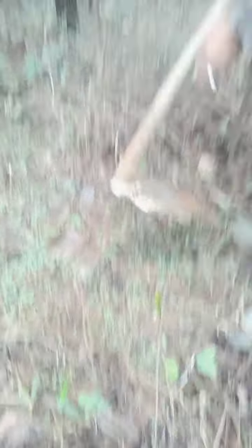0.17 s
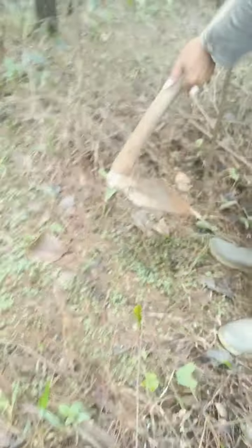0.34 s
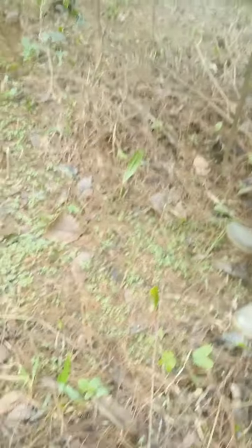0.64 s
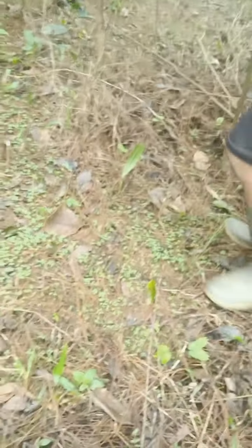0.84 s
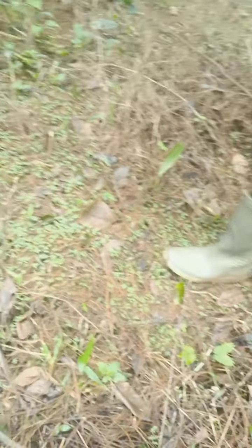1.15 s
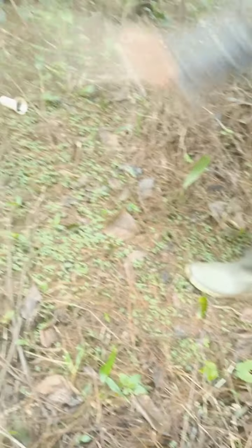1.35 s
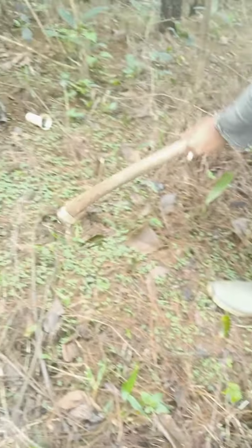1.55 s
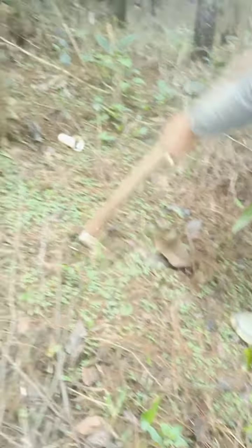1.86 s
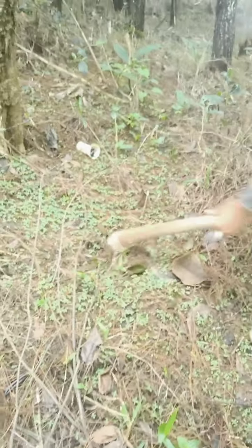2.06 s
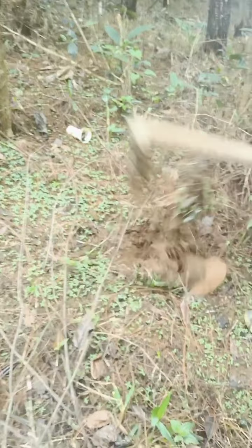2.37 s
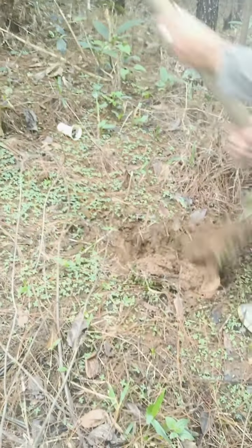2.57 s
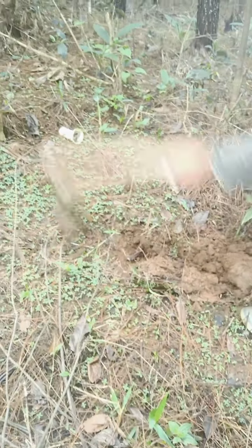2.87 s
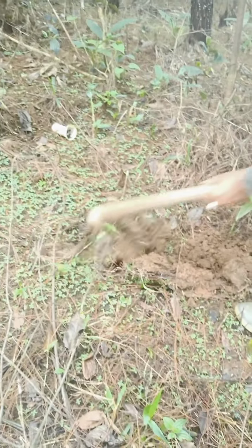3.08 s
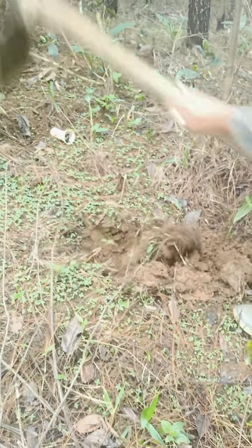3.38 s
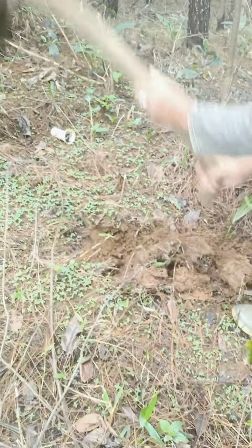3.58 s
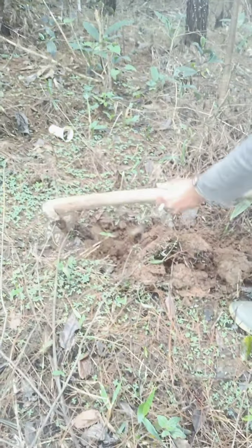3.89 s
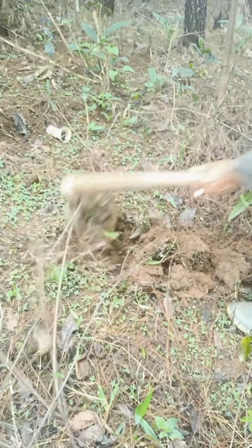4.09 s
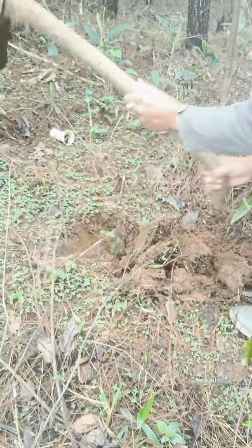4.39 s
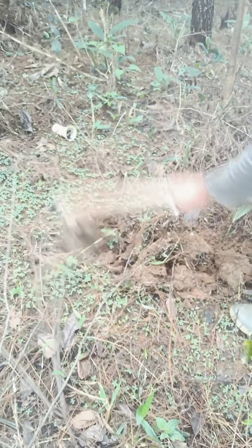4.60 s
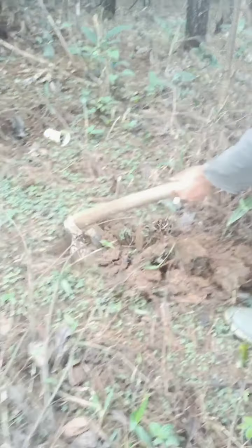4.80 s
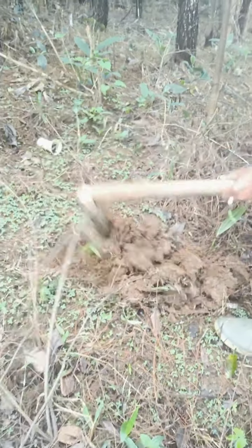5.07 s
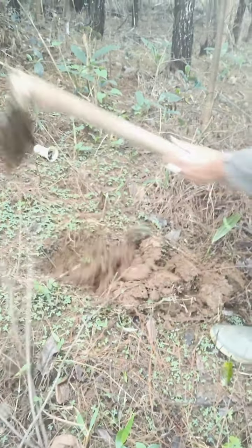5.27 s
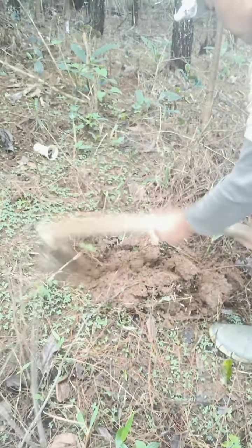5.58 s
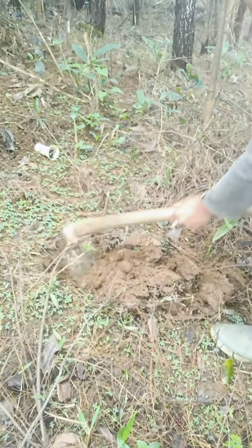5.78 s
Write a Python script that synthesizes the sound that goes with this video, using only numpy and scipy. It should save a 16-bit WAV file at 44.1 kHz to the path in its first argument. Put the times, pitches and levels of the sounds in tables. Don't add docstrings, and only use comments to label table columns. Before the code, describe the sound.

Steady hoe strokes bite into dry, littered ground, each with a crunchy clank and thud, then trickling dirt over a faint distant engine.

```python
import sys
import numpy as np
from scipy import signal
from scipy.fft import rfft, irfft, next_fast_len
from scipy.io import wavfile
from scipy.ndimage import uniform_filter1d, map_coordinates

SR = 44100
rng = np.random.default_rng(int(sys.argv[2]) if len(sys.argv) > 2 else 0)


def pcm_store(signal):
    levels = np.round(np.clip(np.atleast_2d(signal), -1, 1) * 32767)
    wavfile.write(sys.argv[1], SR, levels.astype(np.int16).T)


def rack_gain(trim_db):
    fader = np.asarray(trim_db, float)
    return 10 ** (fader / 20)


N = 261954


def along(points, hz):
    f, v = np.transpose(points)
    return np.interp(np.log(hz + 1), np.log(f + 1), v)


def curves(rows):
    s, *cols = np.transpose(rows)
    return [np.interp(np.arange(N) / SR, s, c) for c in cols]


def unit(x):
    return x / np.sqrt(np.mean(x ** 2) + 1e-20)


def wobble(rate):
    knots = rng.standard_normal(int(N * rate / SR) + 4)
    return map_coordinates(knots, [np.arange(N) * rate / SR])


def filtered(x, response):
    m = next_fast_len(N + 8192)
    return irfft(rfft(x, m) * response(np.fft.rfftfreq(m, 1 / SR)), m)[..., :N]


def ringing(x, modes):
    def response(f):
        total = 0
        for k, (hz, width, db) in enumerate(modes):
            total = total + (-1) ** k * rack_gain(db) * 1j * f * width / (hz * hz - f * f + 1j * f * width)
        return unit(np.abs(total)) * np.exp(1j * np.angle(total))
    return filtered(x, response)


def spread(pair):
    # hz, correlation
    likeness = [(100, 0.882), (400, 0.792), (1000, 0.064), (3000, 0.168), (8000, -0.226), (14000, 0.081)]

    def mid_side(hz):
        turn = np.arccos(np.clip(along(likeness, hz), -1, 1)) / 2
        return np.array([np.cos(turn), np.sin(turn)])
    mid, side = filtered(pair, mid_side)
    return np.array([mid + side, mid - side])


def gritty(shape, share, spiky_db):
    size_db = spiky_db * np.minimum(rng.exponential(size=shape[-1]), 2.2)
    is_grain = rng.random(shape[-1]) < share
    return rng.standard_normal(shape) * (1 + is_grain * rack_gain(size_db))


def patchy(x, patchy_db):
    z = signal.stft(x, nperseg=512)[2]
    field = uniform_filter1d(rng.standard_normal(z.shape[1:]), size=5, axis=0)
    field = uniform_filter1d(field, size=5, axis=1)
    return signal.istft(z * rack_gain(patchy_db * unit(field)), nperseg=512)[1][:, :N]


def air():
    # time_s, level_db
    murmur_level = [(0, -59), (.3, -60.5), (1.9, -59.5), (3.4, -61), (5.94, -60)]
    # hz, level_db per Hz
    murmur_colour = [(24, -33.5), (40, -8), (48, -6), (91, 2.5), (268, -2.5), (333, 3), (408, -4.5),
                     (600, -7.5), (780, -43.5), (1320, -120)]
    # time_s, firing_hz, level_db
    engine_drift = [(0, 34.13, -59), (.15, 34.71, -55.5), (.61, 35.97, -57.5), (.89, 34.91, -59),
                    (1.37, 35.21, -60.5), (1.72, 34.81, -60), (1.85, 33.16, -61), (2.15, 35.42, -60),
                    (2.6, 36.8, -61.5), (2.99, 38.4, -64.5), (3.32, 38.37, -63.5), (3.55, 37.57, -67.5),
                    (4.18, 38.92, -64.5), (4.4, 38.4, -65.5), (4.8, 38.49, -66.5), (5.34, 36.32, -62.5),
                    (5.68, 35.26, -64.5), (5.94, 32.2, -63.5)]
    # multiple, level_db
    orders = [(2.5, -3.5), (3, -5), (4, -0.5), (5, -7), (6, -4), (7, -3.5), (8, -2.5), (9, -0.5),
              (10, -6.5)]
    murmur_db, = curves(murmur_level)
    firing_hz, engine_db = curves(engine_drift)
    noise = spread(filtered(rng.standard_normal((2, N)), lambda hz: rack_gain(along(murmur_colour, hz))))
    phase = 2 * np.pi * np.cumsum(firing_hz) / SR
    engine = 0
    for k, db in orders:
        engine = engine + rack_gain(db + 1.31 * wobble(3.069)) * np.sin(k * phase + k * k / 16)
    return rack_gain(murmur_db + 1.33 * wobble(8.2)) * unit(noise) + rack_gain(engine_db) * unit(engine)


def showers():
    # peak_s, rise_s and fall_s per 10 dB, level_db, grit_db over the rustle
    falls = [(.14, 0.62, 0.66, -63, 1), (.54, .5, .45, -59, -1), (.9, .3, .2, -66, 2),
             (1.345, 0.0541, .1, -50, -8), (1.5, 0.19, 0.2172, -56.5, -5), (1.4, .05, .1, -61, -14),
             (1.6, .25, .09, -53, -2), (1.75, .2, .5, -65, -1), (2.035, 0.0444, 0.26, -54.5, -1.5),
             (2.331, 0.0966, .15, -49, -5), (2.36, .03, .04, -54, -8), (2.47, .08, .06, -50, -12),
             (2.52, .07, 0.07, -46, -12), (2.57, 0.0728, 0.1442, -49, -1.5), (2.8, 0.1153, 0.19, -53.5, -3),
             (3.09, 0.4, 0.3134, -59.5, -1.5), (3.42, -0.05, -0.01, -64.5, -2.5),
             (3.675, 0.02, 0.1432, -59.5, 2.5), (3.92, .3, 0.34, -61, -17), (4.12, 0.36, 0.25, -56, 0),
             (4.65, 0.22, 0.24, -62, -4.5), (4.83, .15, .35, -58, 1), (5.05, .15, 0.3058, -56, -2),
             (5.25, 0.19, 0.47, -62, 1), (5.535, 0, 0.1443, -59.5, 1), (5.93, .09, 0.4, -47.5, -5)]
    # leaves_db, grit_db, clods_db
    rest_db = (-69, -73.5, -69.5)
    t = np.arange(N) / SR
    power = rack_gain(2 * np.array(rest_db))[:, None] * np.ones(N)
    for s, rise, fall, db, fine_db in falls:
        swell_db = db - 10 * np.maximum((s - t) / rise, (t - s) / fall)
        lumps_db = -8.5 - 0.557 * fine_db
        power += rack_gain(2 * swell_db) * rack_gain(2 * np.array([[0], [fine_db], [lumps_db]]))
    swish_db = np.where(t < 1.31, -57.5 - 10 * np.maximum(1.1 - t, 0) / 0.2, -120)
    return [*10 * np.log10(power), swish_db]


def litter():
    # hz, level_db per Hz
    leaf = [(760, -37), (1300, -14), (1660, -3), (1830, -6), (2100, 1), (2580, 0), (3800, -10.5),
            (4940, -39), (8360, -120)]
    # hz, level_db per Hz
    grit = [(2120, -41.5), (3600, -10.5), (4300, -6), (5140, -3.5), (6250, -7), (7520, -12.5), (9670, -13),
            (13500, -15), (15600, -19.5)]
    # hz, level_db per Hz
    crumbs = [(250, -34), (420, -5), (524, -10.5), (777, 0.5), (1220, -4.5), (1400, -5.5), (1820, -32.5),
              (3080, -120)]
    # hz, level_db per Hz
    brush = [(1500, -60), (1950, -13), (2120, 0), (2500, -5), (3050, 0), (3500, -7), (4100, -22),
             (5500, -26), (5900, -9), (6300, -40)]
    clump_db = 0.7 * wobble(16) + 1.5 * wobble(60) + 0.7 * wobble(130)
    out = 0
    for db, colour, grainy in zip(showers(), (leaf, grit, crumbs, brush), (1, 1, 1.3, 0.3)):
        spikes = np.abs(gritty((N,), share=0.011, spiky_db=9.5)) + 0.62
        clumped = spikes * rack_gain(clump_db + 1.05 * wobble(30))
        grains = patchy(rng.standard_normal((2, N)), patchy_db=1.5) * clumped ** grainy
        coloured = filtered(grains, lambda hz: rack_gain(along(colour, hz)))
        out = out + rack_gain(db + 1.46) * unit(spread(coloured))
    return out


def breaks():
    # start_s, peak_db, crack_db, knock_db
    pebbles = [(.0518, -47, -18, -4.5), (.2894, -49, -7, -12), (.4511, -59.5, 7, -20.5),
               (.5242, -54.5, -11, 1.5), (0.9299, -56, 1.5, -8), (1.0154, -52, -12, -4.5),
               (1.596, -50, 0, -20), (1.645, -50, -6, -4), (1.9117, -45, -33, -13.5),
               (3.058, -48.5, -19, -11), (3.454, -45.5, -10, -12.5), (3.8383, -46.5, -11.5, 0.5),
               (4.3114, -46.5, -16, -17), (4.6675, -43.5, -23, -6), (4.7053, -45, -34, -2),
               (4.8773, -45, -20, -11), (5.1701, -50.5, -12.5, -5), (5.389, -49.5, -3, -18.5),
               (5.4088, -47.5, -8, -27), (5.5652, -51, -19, 3.5), (5.659, -42, -8.5, -27.5),
               (5.816, -53, 0, -7.5)]
    # start_s, peak_db,
    # pitch_hz, crack_db, pan_db
    twigs = [(0.1162, -40, 2144, -7.5, 4), (0.6665, -46.5, 2460, -3, 2), (.7612, -42.5, 2340, -16, 2),
             (1.9772, -34.5, 2820, -21, -2.5), (1.9811, -42, 2200, -9.5, 2), (2.072, -41.5, 2540, -9.5, -3),
             (2.2937, -44, 2038, -20, -11), (2.3248, -35, 2123, -7, 2.5), (2.615, -30, 2310, -11, -4.5),
             (3.243, -30.5, 2422, -5.5, 4.5), (3.4122, -22, 2500, -14, 2.5), (3.4159, -32, 2580, -18, -2),
             (3.9011, -38, 2530, -18, -2), (3.931, -35.5, 2100, -7.5, 1.5), (4.1926, -41, 2435, -3.5, 3),
             (4.5521, -19, 1950, -30, 0), (4.6501, -15, 2235, -30, 0), (4.9855, -40, 2580, -15, -1.5),
             (5.019, -39, 2610, -8.5, 2), (5.0444, -44.5, 2400, -8, -19.5), (5.247, -44, 2600, -8.5, -0.5),
             (5.8623, -39.5, 2690, -30, 9), (5.9097, -32, 3116, -1, 1)]
    found = [(s, db, hz, crack_db, -17, pan_db) for s, db, hz, crack_db, pan_db in twigs]
    luck = rng.standard_normal((len(pebbles), 2))
    for (s, db, crack_db, knock_db), (a, b) in zip(pebbles, luck):
        found.append((s, db, 2310 * (1 + 0.069 * a), crack_db, knock_db, 5 * b))
    return found


def ticks():
    # hz, width_hz, level_db
    crack_modes = [(4370, 350, -3), (5050, 350, 0), (5950, 400, 0), (7200, 900, -1), (10500, 4000, -8),
                   (13400, 1200, -2)]
    out, cracks = np.zeros((2, N + SR)), np.zeros((2, N + SR))
    t = np.arange(SR // 40) / SR
    for s, db, hz, crack_db, knock_db, pan_db in breaks():
        at = slice(round(s * SR), round(s * SR) + len(t))
        late = np.maximum(t - rng.uniform(0, 0.0002116, (2, 1)), 0)
        level = rack_gain(db + 2.5 + np.array([[pan_db / 2], [-pan_db / 2]]))
        swell = (late / 0.00046 * np.exp(1 - late / 0.00046)) ** 2
        twig = swell * (np.sin(2 * np.pi * hz * late) + 0.33 * np.sin(2 * np.pi * 2.074 * hz * late))
        wander = np.cumsum(rng.normal(0, 0.31, len(t)))
        rattle = rack_gain(-20 - 60 * t / 0.0272) * np.sin(2 * np.pi * hz * t + wander)
        knock = (1 - np.exp(-t / 0.000643)) * rack_gain(knock_db + 7 - 60 * t / 0.01233)
        knock *= np.sin(2 * np.pi * rng.uniform(820, 1000) * t)
        out[:, at] += level * (twig + rattle + knock)
        crack = (1 - np.exp(-t / 0.000653)) * rack_gain(crack_db + 10.5 - 60 * t / 0.00738)
        cracks[:, at] += level * crack * rng.standard_normal((2, len(t)))
    return out[:, :N] + ringing(cracks[:, :N], crack_modes)


def clods():
    # start_s, pitch_hz, level_db
    drops = [(.525, 578, -47.5), (1.025, 388.4, -41), (2.312, 790, -42), (2.43, 780, -45),
             (2.465, 800, -45), (2.482, 760, -41), (2.505, 800, -44), (2.516, 820, -41), (2.527, 780, -41),
             (2.545, 800, -45), (4.585, 260, -42), (5.565, 545.8, -43.5), (5.849, 420, -36)]
    out, t = np.zeros(N + SR), np.arange(SR // 10) / SR
    for s, hz, db in drops:
        t60 = 0.0477 * min(1, 450 / hz)
        envelope = (1 - np.exp(-t / 0.00166)) * rack_gain(db - 60 * t / t60)
        out[round(s * SR):][:len(t)] += envelope * np.sin(2 * np.pi * hz * t)
    return out[:N]


def crush_steps():
    # start_s, blade_db, edge_db over the blade, depth (0-1)
    cuts = [(1.302, -50.5, -1.5, 0.38), (1.3131, -29.5, -3.5, 0.49), (1.3185, -16, -9, .6),
            (1.3211, -11.5, -4.5, 0.42), (1.3232, -16.5, -24, 0.21), (2.7863, -37, -1, 0.04),
            (2.806, -34.5, -1.5, 0.49), (2.8115, -25.5, -6, 0.78), (2.8135, -19, -2, 0.68),
            (2.8155, -18, -6.5, 0.45), (2.8384, -32.5, -2, 0.08), (3.612, -36.5, -5, 0.08),
            (3.6262, -23.5, -7, 0), (3.6314, -30, 4.5, 0.05), (3.6349, -23, -0.5, 0.83),
            (4.5305, -34.5, -7.5, 0), (4.5423, -35.5, 4, 0), (4.5514, -19.5, -13.5, 0.03),
            (4.5557, -31, 0, 0.98), (4.5781, -47, 7, 0.06), (4.5983, -48, -9.5, 0.02), (5.459, -50, -7, .2),
            (5.4646, -40.5, -6, 0.72), (5.472, -37, -1, 0.69), (5.4769, -33.5, .5, 0.51),
            (5.49, -40, -4.5, 0.83), (5.4973, -35.5, -1, 0.69), (5.5024, -32.5, -6, 0.83)]
    # first_s, level_db, gap_s, loss_db a step
    settles = [
        (1.326, -23, 0.00497, 10),
        (2.8204, -28, 0.00813, 5.5),
        (3.6404, -28.5, .0049, 2),
        (4.5589, -32.5, .009, 5.5),
        (5.5129, -39.5, .018, 17.5),
    ]
    # start_s, blade_db, edge_db over the blade, depth (0-1)
    drags = [(2.004, -52, 2, .2), (2.01, -48, 0, .4), (2.312, -41, -5.5, 0.47), (2.3217, -39, -1.5, 0.3),
             (2.5137, -43, -15, 0.62), (2.5313, -39, -8, .3), (2.548, -42.5, -5.5, .25),
             (3.386, -53.5, -13.5, 0.78), (5.019, -44, -0.5, 0.44), (5.043, -42.5, .5, .3),
             (5.124, -48.5, 1.5, 0.32), (5.8481, -42.5, -22.5, 0.88), (5.926, -43.5, 0.5, 0)]
    # from_s, clods_db, thud_db, dust_db
    soils = [(0, -3, -8, -9), (2, 1, -4, -2), (2.7, -4, -4, -2), (3.5, 1, 0, -4.5), (3.62, -3, -6, 7),
             (4.4, 0, -8, -7.5), (4.54, 0, -12, 1), (4.9, -1, 2.5, -0.5), (5.4, -4, -5, 1),
             (5.7, -1.5, 0, 4.5)]
    settling = []
    for s, db, gap, loss_db in settles:
        for k in range(3):
            settling.append((s + k * gap, db - k * loss_db, -6, 0.684 + 0.04 * k))
    steps = []
    for s, db, edge_db, depth in cuts + settling + drags:
        clod_db, thud_db, dust_db = [soil for start, *soil in soils if start <= s][-1]
        clod_db += -14 + 15 * depth
        thud_db += -24 + 27 * depth
        t60 = 0.024 - 0.00044 * (db + 12)
        steps.append((s, db, edge_db, clod_db, thud_db, dust_db, t60))
    return steps


def rings():
    # start_s, blade_db, ground_db, pan_db, left_lag_s
    moments = [
        (1.3195, -7, -14, -1.5, .00004),
        (2.8125, -9.5, -15, -.5, -.00004),
        (3.634, -15, -16, 2, .00003),
        (4.5535, -15, -23, 0, 0),
        (5.474, -27, -26, 0, 0),
        (5.501, -24, -23, 0, 0),
    ]
    # pitch_hz, width_hz, level_db
    grips = [
        [(689, 45, -4), (904, 40, -4), (1600, 51, -6), (1810, 59, -4), (2140, 36, -6), (2440, 130, 0),
         (2910, 30, -9), (3110, 20, -13)],
        [(797, 54, -1), (1140, 34, -6), (1540, 74, 0), (1670, 22, 0), (2170, 30, -2), (2550, 240, 0),
         (3100, 39, -14), (3490, 37, -14)],
        [(738, 59, 0), (926, 23, -2), (1320, 40, -7), (2130, 120, -3), (2430, 100, 0), (2720, 35, -6),
         (3110, 47, -7)],
        [(797, 69, 0), (1440, 28, -8), (1790, 75, -2), (2390, 27, -5), (2550, 15, -8), (2740, 55, -3),
         (3140, 23, -12)],
        [(845, 84, -5), (1150, 38, -4), (1340, 120, -8), (2300, 130, 0), (2760, 40, -7)],
        [(926, 41, -6), (1280, 81, -7), (1970, 50, 0), (2370, 41, -4), (3200, 110, -11)],
    ]
    # pitch_hz, width_hz, level_db
    booms = [
        [(75, 60, -3), (165, 90, 0), (314, 50, -3)],
        [(160, 100, 0), (290, 60, 0)],
        [(165, 60, 0), (291, 70, -2), (477, 60, -4)],
        [(240, 80, 0), (323, 60, 0), (403, 50, 0), (499, 50, -1)],
        [(200, 70, 0), (270, 60, -4)],
        [(187, 60, 0), (350, 50, -3)],
    ]
    out, t = np.zeros((2, N + SR)), np.arange(SR // 8) / SR
    for (s, blade_db, ground_db, pan_db, lag), grip, boom in zip(moments, grips, booms):
        notes = [(hz, width + 40, db + blade_db) for hz, width, db in grip]
        notes += [(hz, width, db + ground_db) for hz, width, db in boom]
        late = np.maximum(t - np.maximum([[lag], [-lag]], 0), 0)
        at = slice(round(s * SR), round(s * SR) + len(t))
        for k, (hz, width, db) in enumerate(notes):
            wander = rng.uniform(0, 2 * np.pi) * (hz > 600) + np.pi * k
            wander = wander + np.cumsum(rng.normal(0, 0.03, len(t))) * hz / 2500
            side_db = (pan_db + rng.normal(0, 3)) * min(hz / 700, 1) / 2
            swell = (1 - np.exp(-late / 0.002)) * np.exp(-np.pi * width * late) * width / 100
            level = rack_gain(db + np.array([[side_db], [-side_db]]))
            out[:, at] += level * swell * np.sin(2 * np.pi * hz * late + wander)
    return filtered(out[:, :N], lambda hz: hz ** 4 / (hz ** 4 + 58 ** 4))


def scatter(x):
    # hz, t60_s
    wash_t60 = [(300, 0.196), (1000, 0.1275), (3000, 0.216), (6000, 0.252), (14000, 0.153)]
    colour = [(250, -28), (500, 1.0), (2400, -7.5), (4000, -1.5)]  # (Hz, dB)
    hz, t, z = signal.stft(rng.standard_normal((2, SR // 2)), SR, nperseg=256)
    decay = rack_gain(-60 * t / along(wash_t60, hz)[:, None])
    tail = signal.istft(z * decay * rack_gain(along(colour, hz))[:, None], SR, nperseg=256)[1]
    return signal.fftconvolve(x, tail / np.linalg.norm(tail[0]), axes=1)[:, :N]


def chops():
    # hz, width_hz, level_db
    face = [(1538.4, 193, -1.5), (1828, 212, 2), (2126, 328.5, 2.5), (2500, 401, 4), (3068, 705, -9)]
    # hz, width_hz, level_db
    edge = [(4495, 2220, -1.5), (5578, 590, 1.5), (6026, 162, 2.5), (7590, 2590, -8.5)]
    # hz, width_hz, level_db
    lump = [(698.7, 117.7, 0), (921.6, 84, -1.5), (1302, 378, -9)]
    # hz, width_hz, level_db
    dust = [(8160, 1500, -3), (11180, 1800, 1.5), (13650, 2600, -0.5)]
    # hz, width_hz, level_db
    ground = [(90, 50, -10), (185, 150, -3), (325, 90, 2), (480, 80, -6)]
    # hz, level_db
    port_side = [(250, -3), (1000, -7), (4000, -3), (8000, -3), (12000, 2.5)]
    drive, push = np.zeros((4, 2, N + SR)), np.zeros(N + SR)
    t = np.arange(SR // 16) / SR
    for s, db, edge_db, clod_db, thud_db, dry_db, t60 in crush_steps():
        at = slice(round(s * SR), round(s * SR) + len(t))
        burst = (1 - np.exp(-t / 0.000294)) * rack_gain(-60 * t / max(t60, 0.004))
        grit = burst * gritty((4, 2, len(t)), share=0.046, spiky_db=2)
        grit[:, 0, :3] += 1.657 * rng.choice([-1, 1])
        grit *= np.linalg.norm(burst) / np.linalg.norm(grit, axis=2, keepdims=True)
        dust_db = 0.621 * db + 1.08 * edge_db - 18.5 + dry_db
        levels_db = np.array([db + 0.6, db + edge_db + 5.0, db + clod_db + 6.0, dust_db])
        drive[..., at] += rack_gain(levels_db)[:, None, None] * grit
        shove = t / 0.000572 * np.exp(1 - t / 0.000676)
        push[at] += rack_gain(db + thud_db - 10) * rng.choice([-1, 1, 1]) * shove
    pair = sum(ringing(d[:, :N], modes) for d, modes in zip(drive, (face, edge, lump, dust)))

    def ports(hz):
        return hz ** 2 / (hz ** 2 + 330 ** 2) * np.array([1 + 0 * hz, rack_gain(along(port_side, hz))])
    near = spread(filtered(pair, ports)) * rack_gain([[-0.8], [0.8]])
    thud = filtered(ringing(push[:N], ground), lambda hz: hz ** 2 / (hz ** 2 + 70 ** 2))
    near = near + rings()
    return near + thud + rack_gain(-16) * scatter(near)


def scene():
    return air() + litter() + ticks() + clods() + chops()


def low_pass(x):
    return signal.sosfilt(signal.butter(12, 16800, fs=SR, output="sos"), x)


def record(dry):
    # hz, level_db
    port = [(30, -7.5), (45, -1), (70, 0.5), (6800, 0), (9800, -7), (13500, -1), (15300, 1), (15900, -14),
            (16600, -24.5), (16900, -89)]
    heard = filtered(dry, lambda hz: rack_gain(along(port, hz))) + 0.001085
    return low_pass(heard)


dry = scene()
out = record(dry)
pcm_store(out)
```